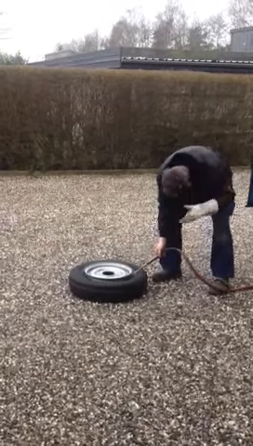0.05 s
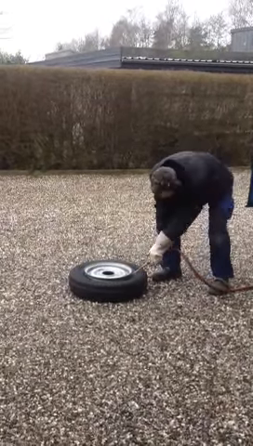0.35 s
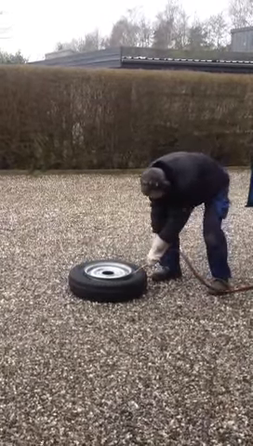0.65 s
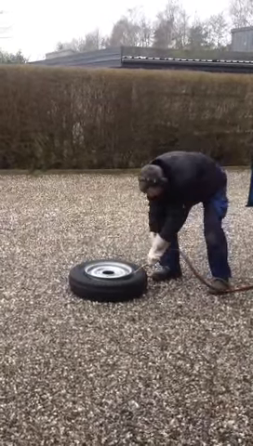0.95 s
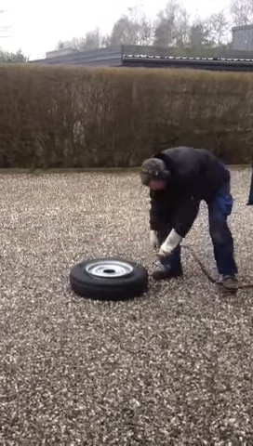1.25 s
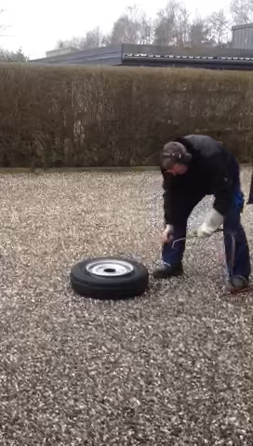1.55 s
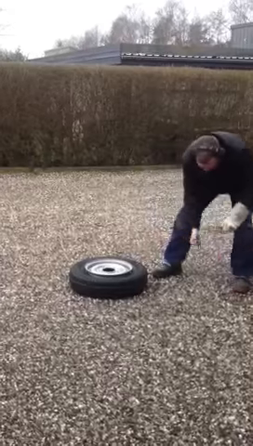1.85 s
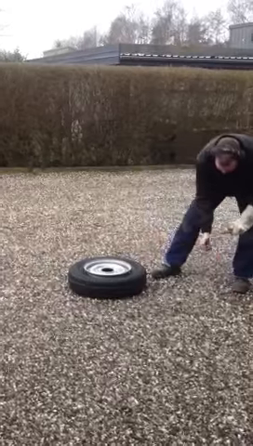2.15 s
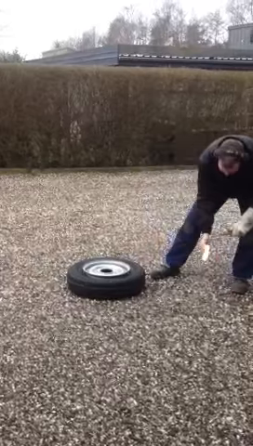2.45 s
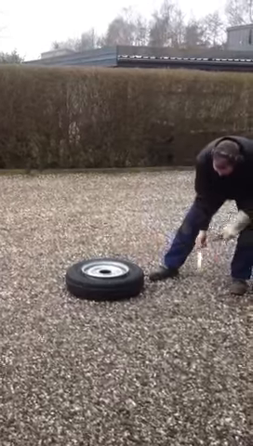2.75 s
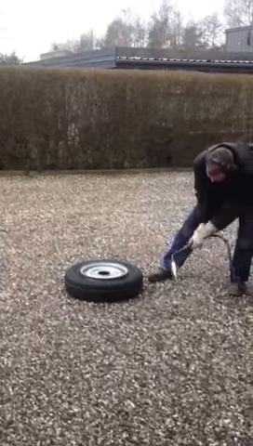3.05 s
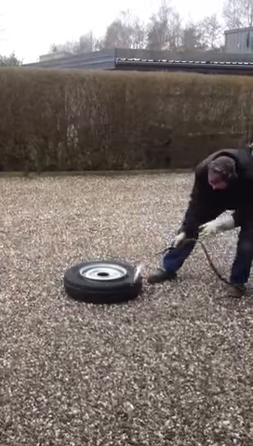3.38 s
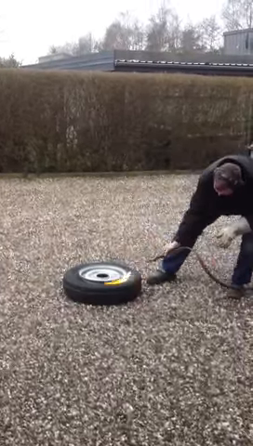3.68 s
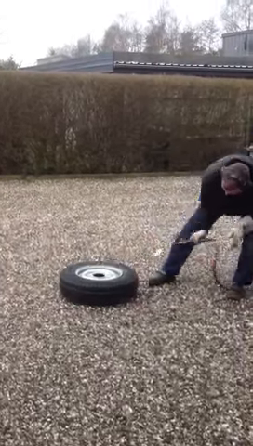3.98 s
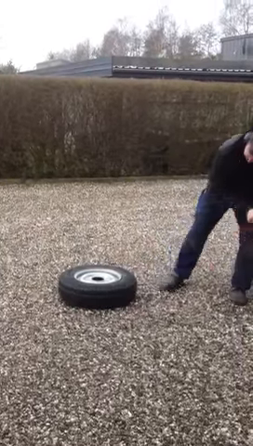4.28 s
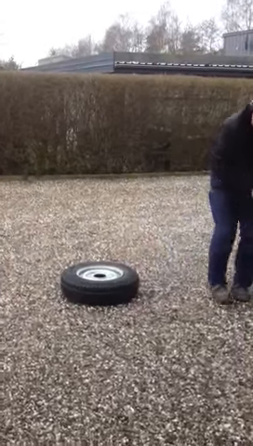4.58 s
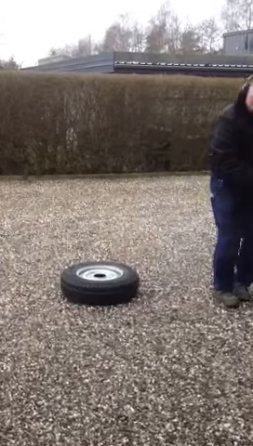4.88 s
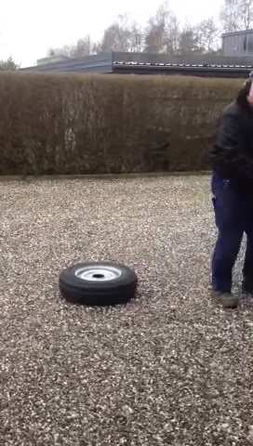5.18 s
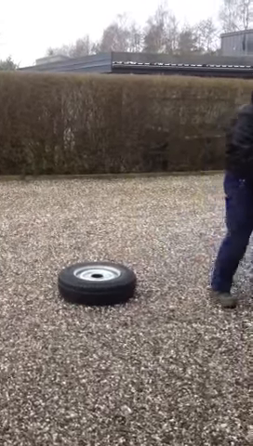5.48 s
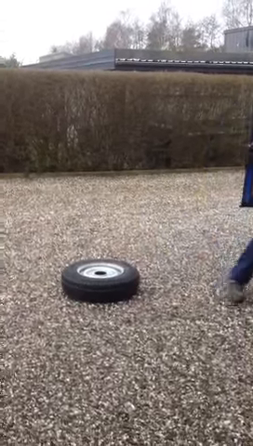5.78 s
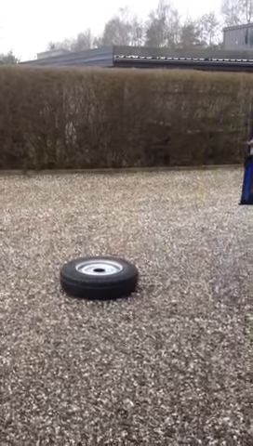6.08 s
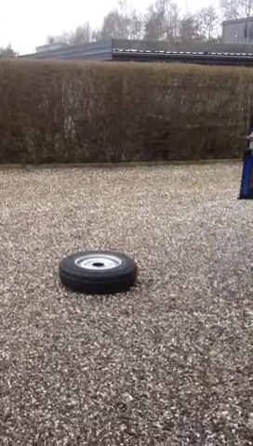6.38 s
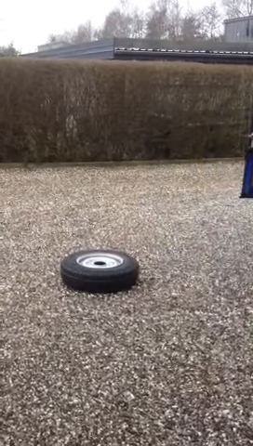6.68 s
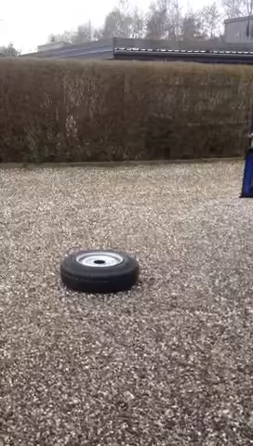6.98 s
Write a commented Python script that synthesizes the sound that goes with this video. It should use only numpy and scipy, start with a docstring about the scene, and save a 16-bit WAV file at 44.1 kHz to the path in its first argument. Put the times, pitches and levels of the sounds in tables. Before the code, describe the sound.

A quiet gravel yard is heard from one fixed microphone, with a faint distant rumble throughout. For the first two seconds feet shift and stones click, gas leaks very faintly, and a metal torch clinks lightly at about 1.2 seconds. At 2.5 seconds an igniter snaps sharply and the torch burns with a hiss over a soft roar. At 3.8 seconds vapour in a tyre explodes with a sharp bang, the loudest sound, slamming it onto its steel rim, which rings briefly. Air immediately hisses out, dulling and fading until about 6.3 seconds. Over this, the torch hiss turns loud and bright from 4.2 seconds and is shut off at 5. A few stones click around 6.3 seconds, then a compressed-air hose starts a softer, hollow hiss with a hoarse whistle, lasting to the end at 7 seconds. A slight gust brushes the microphone just before the end.

```python
"""A gravel yard, one fixed microphone: a tyre is blown onto its steel rim with fire, then filled with air.
Feet shift on the stones, gas leaks and the torch clinks; it snaps alight and roars. The vapour in the
tyre goes off with a bang that slams the beads home. Air hisses out and dies away, and meanwhile the
torch swings round and is shut off. Last, a compressed-air hose starts to blow and a gust brushes the
microphone. A distant rumble lies under it all."""
import sys
import numpy as np
from scipy import signal
from scipy.fft import rfft, irfft, next_fast_len
from scipy.io import wavfile
from scipy.ndimage import uniform_filter1d, map_coordinates

SR = 44100
rng = np.random.default_rng(int(sys.argv[2]) if len(sys.argv) > 2 else 0)


def generate_wav(sig):
    """Save sig (samples, or channels by samples) to the path in sys.argv[1] as 16-bit PCM at SR."""
    pcm = np.round(np.clip(np.atleast_2d(sig).T, -1, 1) * 32767).astype(np.int16)
    wavfile.write(sys.argv[1], SR, pcm)


N = 310464
TIME = np.arange(N) / SR


def bang():
    """The vapour flashes and the beads slam on the rim; the steel wheel rings on into the yard."""
    # blows from the flash to the beads seating: t/s, level/dB, f/Hz, t60/s, share of rattle
    blows = [(3.8056, -6, 750, 0.016, 0.53), (3.8079, -5, 513, .02, 0.41), (3.812, -3, 203, 0.06, 0.13),
             (3.8174, 3, 5700, 0.0027, 0.26), (3.8275, 1, 595, 0.014, 0.59), (3.828, -8.5, 1990, .007, .85),
             (3.8285, -16.5, 239, 0.045, 0.19), (3.834, -2, 740, 0.024, 0.39),
             (3.838, -11.5, 554, 0.088, 0.59)]
    # modes of the wheel: f/Hz, level/dB, t60/s
    wheel_modes = [(233.6, 5.5, 0.24), (407, -2.5, 0.4), (546, -2, 0.55), (678, -20, 0.33),
                   (857, 15, 0.082), (980, -13, 0.63), (1047, -19, 0.73), (1098, -25, 0.3), (1224, 6, 0.1),
                   (1562, 0.5, 0.073)]
    t, out = np.arange(SR // 2) / SR, np.zeros(N)
    for s, db, hz, t60, share in blows:
        # the rattle spreads around each blow's pitch
        band = signal.butter(2, [hz / 4, min(2 * hz, SR / 5)], "band", fs=SR, output="sos")
        rattle = unit(signal.sosfilt(band, rng.standard_normal(len(t))))
        thud = np.sin(2 * np.pi * hz * t)
        add(out, s, amp(db - 60 * t / t60) * ((1 - share) * thud + share * rattle))
    ring = sum(amp(db - 60 * t / t60) * np.sin(2 * np.pi * hz * t) for hz, db, t60 in wheel_modes)
    add(out, blows[-1][0], amp(-29.5) * ring)
    return yard_echo(out, first_db=-15, late_db=-18, first_t60=0.09)


def tyre_cavity():
    """The air in the tyre rings after the bang and sags in pitch as it cools."""
    # the sagging note: t/s, f/Hz, level/dB
    note = [(3.845, 562, -30.5), (3.89, 547, -32), (3.95, 507.7, -35), (4.0, 494, -35), (4.015, 488, -53),
            (4.09, 458, -47.5), (4.18, 441, -65)]
    return wavering_tone(note, rough=0.15, width_hz=25)


def bead_spurt():
    """Gas squeezes past the closing beads."""
    # spectrum of the spurt: f/Hz, level/dB
    colour = [(60, -21), (400, 5.5), (1200, 4.5), (3000, -2.5), (6000, 1), (9000, -24.5), (15000, -23.5)]
    squeeze = amp(-26) * attack(3.778, rise=0.039) * release(3.83, t60=0.052)
    return squeeze * tint(rng.standard_normal(N), colour)


def torch():
    """Gas leaks, then burns: a nozzle hiss over a roar, brighter once it faces the microphone."""
    # spectrum of the unlit gas: f/Hz, level/dB
    gas_colour = [(120, -13), (200, -3), (500, 0), (1200, -6.5), (2100, -7.5), (3000, -7.5), (4400, -5.5),
                  (5100, -15), (6500, -9), (7300, -21), (8300, -15), (9800, -27), (12000, -21),
                  (15500, -31)]
    # spectrum of the flame: f/Hz, level/dB
    flame_colour = [(80, -37.5), (140, -11.5), (300, 0), (420, 0.5), (650, -2), (1200, 1), (2100, -1),
                    (3000, -3), (6000, -26)]
    # hiss of the nozzle aimed at the tyre: t/s, level/dB
    aimed_level = [(2.56, -41.5), (2.65, -39.5), (3.018, -43), (3.116, -36.5), (3.238, -33), (3.32, -42),
                   (3.602, -41), (3.632, -36.5), (3.698, -42), (3.762, -33.5), (3.78, -37)]
    # its spectrum: f/Hz, level/dB
    aimed_colour = [(1200, -33), (2000, -11), (2900, -9.5), (3600, -1.5), (4050, 0), (4450, 4.5),
                    (4950, -6.5), (5700, 0.5), (6500, -0.5), (7600, -7), (9700, -15.5), (12300, -16.5),
                    (13500, -21.5), (15500, -28)]
    # hiss of the nozzle swung round to the microphone: t/s, level/dB
    facing_level = [(4.29, -26.5), (4.448, -23), (4.484, -17), (4.586, -28), (4.646, -23), (4.73, -23.5),
                    (4.95, -20.5)]
    # its spectrum from the front: f/Hz, level/dB
    facing_colour = [(1290, -32.5), (2200, -18.5), (2610, -14.5), (3420, -10), (4330, 1.5), (5060, -5),
                     (5720, 0.5), (6160, -3.5), (7190, 3.5), (8060, 0), (9340, -12.5), (12500, -10),
                     (13800, -33), (14800, -12), (15500, -22)]
    lit_s, near_s, shut_s, valve_s = 2.505, 3.5, 4.958, 0.034

    leaking = amp(-65.5) * attack(0.21, rise=0.27) * release(lit_s, t60=valve_s)
    gas = leaking * turbulence(gas_colour, patchy_db=0.5, flutter_db=0.9, echo=0.15)
    # once shut off, the flame lives on briefly on the gas left in the pipe
    supply = amp(-4.5 * attack(shut_s, rise=valve_s)) * release(5.09, t60=0.28)
    alight = attack(lit_s, rise=0.01) * supply
    aimed = amp(-0.07) * held(aimed_level) * alight * release(3.8, t60=1)
    nozzle = aimed * turbulence(aimed_colour, patchy_db=3, flutter_db=0.25, echo=0.23)
    away = 1 - attack(lit_s, rise=near_s - lit_s)  # the flame gains body as the torch comes nearer the tyre
    burning = alight * attack(lit_s, rise=0.17) * amp(-42.5 - 4 * away)
    flame = burning * turbulence(flame_colour, patchy_db=2.8, flutter_db=0.2, echo=0.22)
    facing = amp(-1.3) * held(facing_level) * attack(4.21, rise=0.11) * release(shut_s, t60=valve_s)
    rush = facing * turbulence(facing_colour, patchy_db=2.5, flutter_db=0.73, echo=0.15)
    on_tyre = amp(-53 - 8 * abs(TIME - 3.33))  # the low flutter peaks as the flame plays on the tyre
    flutter = on_tyre * alight * band_noise(180.4, width_hz=85)
    return gas + nozzle + flame + rush + flutter


def escaping_air():
    """A jet at the tyre fades and dulls as the pressure behind it falls; a narrow band in its treble sinks too."""
    # spectrum of the jet: f/Hz, level/dB
    colour = [(300, -44.5), (1400, -22.5), (2050, -12), (2600, -13.5), (3400, -6.5), (4300, -2.5),
              (5000, -6.5), (6000, 0), (6800, 0.5), (8000, -6.5), (9200, -10.5), (11000, -14),
              (12200, -12.5), (15300, -21)]
    spent_s, run_down_s = 6.367, 1.674
    flow = np.clip((spent_s - TIME) / run_down_s, 0, 1)
    jet = turbulence(colour, patchy_db=2.5, flutter_db=0.5, echo=0.069)
    treble = signal.sosfiltfilt(signal.butter(2, 9500, "high", fs=SR, output="sos"), jet)
    spit_db = 6.5 * swell(4.07, length=0.04)  # the jet spits once, brightly
    treble_gain = amp(6.5 + spit_db) * flow ** 0.51
    sinking_band = amp(-18.5) * hoarse_tone(8300 + 5200 * flow, width_hz=250)
    loudness = amp(-29) * attack(3.84, rise=0.12) * flow ** 1.247
    return loudness * (jet + (treble_gain - 1) * treble + sinking_band)


def hose():
    """Compressed air sounds hollow in its tube, and whistles hoarsely at the coupling."""
    # spectrum of the air in the tube: f/Hz, level/dB
    colour = [(150, -45), (250, -15), (411, -14), (609, -34), (699, -17), (904, -13.5), (1860, -10),
              (2020, -7.5), (2950, -11), (4220, -1.5), (5190, -9.5), (8100, 2), (9280, -13.5),
              (10600, -11.5), (15000, -27)]
    # the coupling chirps up as the air starts, then holds its note: t/s, f/Hz, level/dB
    note = [(6.38, 4200, -63), (6.44, 4180, -58), (6.46, 4250, -48), (6.485, 4420, -51), (6.6, 4270, -49.5),
            (6.8, 4300, -60), (7.04, 4280, -57)]
    on_s, build_s = 6.44, 0.18  # the valve opens quickly, then the flow keeps building
    open_s = np.maximum(TIME - on_s, 0)
    flow = amp(-42.5 - 9 * np.exp(-open_s / build_s)) * attack(on_s, rise=0.088)
    air = turbulence(colour, patchy_db=3.5, flutter_db=0.7, echo=0.24, lag_ms=1.88)
    climbing_tone = amp(-24) * hoarse_tone(9700 + 2900 * open_s, width_hz=200)
    fuzz = amp(-4) * band_noise(4280, width_hz=350) + amp(-9) * band_noise(3760, width_hz=220)
    whistle = amp(-3) * wavering_tone(note, rough=3, width_hz=80)
    return flow * (air + climbing_tone) + whistle + note_gain(note) * fuzz


def igniter():
    """A spring hammer snaps and rebounds."""
    # trigger, snap and rebounds: t/s, level/dB, extra treble/dB
    strikes = [(2.487, -22.5, 34), (2.498, -1.5, -2), (2.4992, -9.5, 7), (2.5038, -20, -10),
               (2.5065, -23, -19)]
    # spectrum of one strike: f/Hz, level/dB
    colour = [(80, -51), (130, -11.5), (220, -6), (450, -9.5), (950, 1.5), (1800, 0.5), (2250, -2.5),
              (2650, 0), (3000, -7.5), (3400, -0.5), (4450, -4.5), (6200, -16.5), (7100, -24), (15000, -44)]
    out = np.zeros(N)
    for s, db, treble_db in strikes:
        add(out, s, amp(db) * click(colour, treble_db))
    return yard_echo(out, first_db=-5, late_db=-15.5, first_t60=0.076)


def gravel():
    """Single stones click and chatter; soles grind many small ones and raise grit; the hose drags."""
    # stones clicking underfoot: t/s, level/dB, extra treble/dB
    stones = [(0.177, -45.5, -11), (0.204, -44, -22), (0.474, -46, -5), (0.522, -46, -5),
              (0.5756, -35.5, -14), (1.102, -27, -8), (1.112, -32, -10), (1.568, -29.5, -22),
              (1.626, -31, -12), (1.769, -35.5, 10), (1.801, -31.5, -15), (1.883, -38, -6),
              (1.892, -34.5, 5), (1.935, -24.5, -19), (1.965, -26, -6), (1.976, -23.5, -21),
              (2.02, -32, -11), (2.113, -26.5, -7), (6.305, -36.5, 9), (6.351, -30, 7), (6.432, -31, 9)]
    # spectrum of one stone: f/Hz, level/dB
    stone_colour = [(100, -16), (300, -19), (800, 5), (1300, 7.5), (2200, -1.5), (3200, 4.5), (4400, -1.5),
                    (5200, -6.5), (6400, -1.5), (9500, -66), (15000, -30)]
    # soles grinding the gravel: t/s, level/dB, rise/s, length/s, crunch f/Hz
    steps = [(0.194, -57.5, .008, .03, 1090), (0.573, -45, 0.0012, 0.011, 660),
             (1.05, -43.5, 0.047, 0.06, 1480), (1.188, -42, 0.014, 0.059, 3300),
             (1.364, -52, .015, 0.051, 5500), (1.57, -45.5, .001, 0.016, 1320),
             (1.62, -46.5, .004, 0.055, 1870), (1.786, -51, .006, 0.044, 1210),
             (1.886, -46, 0.026, 0.063, 2000), (1.936, -42, .002, 0.061, 1230),
             (2.089, -47.5, .002, .011, 4620), (2.109, -47, 0.0023, 0.026, 1400),
             (6.504, -40.5, .001, .006, 6360), (6.533, -45.5, 0.0056, 0.046, 790),
             (6.63, -43.5, .003, 0.04, 756), (6.878, -45, 0.0032, 0.036, 474)]
    # spectrum of the hissing grit: f/Hz, level/dB
    grit_colour = [(60, -35), (120, -13.5), (200, -3), (500, 0), (1200, 0.5), (2100, -5.5), (3000, -8.5),
                   (4400, -6), (5100, -13), (6500, -10), (8300, -17.5), (9800, -24.5), (12000, -20),
                   (15500, -27)]
    chatter_t60_s, grains_per_s, grain_spread_db = 0.014, 2600, 3
    t = np.arange(SR // 4) / SR
    out, pressure = np.zeros((2, N))
    for s, db, treble_db in stones:
        chatter = rng.standard_normal(len(t)) * amp(-60 * t / chatter_t60_s)
        contacts = (t == 0) + amp(-2.5) * chatter / np.linalg.norm(chatter)
        add(out, s, amp(db) * signal.fftconvolve(contacts, click(stone_colour, treble_db)))
    for s, db, rise, length, hz in steps:
        grains = rng.standard_normal(len(t)) * (rng.random(len(t)) < grains_per_s / SR)
        grains *= amp(grain_spread_db * rng.standard_normal(len(t)))
        crunch = unit(resonate(resonate(grains, hz, 0.45 * hz), hz, 2.1 * hz))
        weight = amp(db) * (1 - np.exp(-t / rise)) * np.exp(-(t / length) ** 2)
        add(out, s, weight * crunch)
        add(pressure, s, weight)
    drag = amp(-51) * attack(1.008, rise=0.17) * release(1.69, t60=0.82)
    grit = (drag + amp(-6) * pressure) * turbulence(grit_colour, patchy_db=1, flutter_db=1.5, echo=0.15)
    return yard_echo(out, first_db=-8, late_db=-15, first_t60=0.07) + grit


def clink():
    """One knock sets the metal of the torch ringing."""
    # modes of the metal: f/Hz, level/dB, t60/s
    modes = [(1320, -0.5, 0.11), (1390, 3, 0.1), (2367, -3, 0.17), (2490, 4, 0.1), (2980, -8.5, 0.39),
             (3383, -0.5, 0.37), (3425, 2, 0.22), (3920, -8.5, 0.46), (3970, -11, 0.23), (4280, -3, 0.48),
             (4624, -15, .35), (5518, -11, 0.35), (6492, -9, 0.18)]
    t, out = np.arange(SR // 2) / SR, np.zeros(N)
    ring = sum(amp(db - 60 * t / t60) * np.sin(2 * np.pi * (hz * t + rng.random()))
               for hz, db, t60 in modes)
    onset = 1 - np.exp(-t / 0.00067)
    add(out, 1.214, amp(-37) * ring * onset)
    return yard_echo(out, first_db=-10, late_db=-13.5, first_t60=0.089)


def thin_whistle():
    """A faint whistle slips down in pitch before the torch is lit."""
    # its glide: t/s, f/Hz, level/dB
    note = [(0.64, 2580, -78), (0.76, 2480, -76), (0.79, 2200, -101), (0.83, 2070, -72), (0.93, 2080, -69),
            (1.02, 2080, -69), (1.06, 2010, -76)]
    return wavering_tone(note, rough=0.6, width_hz=70)


def outdoors():
    """The steady air of the yard, a distant rumble, and one gust on the microphone."""
    # spectrum of the quiet yard: f/Hz, level/dB
    air_colour = [(40, -35), (90, -7), (170, 9.5), (450, 2), (800, -4), (1500, -20.5), (3000, -16.5),
                  (6500, -18), (10000, -34.5), (13500, -22), (15500, -20)]
    # spectrum of the far-off rumble: f/Hz, level/dB
    rumble_colour = [(50, -35), (100, -7.5), (160, -6), (300, -9), (900, -3.5), (2000, -4), (4000, -22.5)]
    # its slow rise and fall: t/s, level/dB
    rumble_level = [(0, -72.5), (.5, -65), (2.4, -63), (5.2, -62), (5.7, -56.5), (7.04, -59.5)]
    air = amp(-66) * turbulence(air_colour, patchy_db=3.5, flutter_db=1)
    rumble = held(rumble_level) * turbulence(rumble_colour, patchy_db=1.5, flutter_db=2)
    gust = amp(-55.5) * swell(6.9, length=0.08) * band_noise(120.4, width_hz=116)
    return air + rumble + gust


def yard_echo(x, first_db, late_db, first_t60):
    """Adds quick scatter from the gravel and the wheel, then a faint tail from hedge and buildings."""
    # decay of the yard: f/Hz, t60/s
    decay = [(100, 0.12), (400, 0.62), (900, 0.63), (2000, 0.59), (6000, 0.22), (14000, 0.12)]
    t = np.arange(SR // 2) / SR
    taps = rng.choice([-1., 1.], len(t)) * (rng.random(len(t)) < 4000 / SR) * (t > 0.002)
    hz, frame_s, spectra = signal.stft(taps, SR, nperseg=256)
    fading = amp(-60 * frame_s / read(decay, hz)[:, None])
    tail = signal.istft(spectra * fading, SR, nperseg=256)[1][:len(t)]
    first = rng.standard_normal(len(t)) * amp(-60 * t / first_t60) * (t > 0.001)
    response = amp(first_db) * first / np.linalg.norm(first) + amp(late_db) * tail / np.linalg.norm(tail)
    return x + signal.fftconvolve(x, response)[:N]


def turbulence(colour, patchy_db, flutter_db, echo=0, lag_ms=None, size=512):
    """Noise of rms 1 with drifting patches, a shared flutter and the comb of a close reflection."""
    # lag of the ground echo as the torch moves, used unless lag_ms is given: t/s, lag/ms
    ground_lag = [(2.4, 0.96), (2.55, 3), (3.55, 1.47), (6.3, 2.6)]
    if lag_ms is None:
        lag_ms = np.interp(TIME, *np.transpose(ground_lag))
    frames, bins = N * 4 // size + 5, size // 2 + 1
    real, imag, patches = rng.standard_normal((3, frames, bins))
    patches = unit(uniform_filter1d(uniform_filter1d(patches, size=30, axis=0), size=2, axis=1))
    flutter = unit(uniform_filter1d(rng.standard_normal(frames), size=6))
    spectra = (real + 1j * imag) * amp(patchy_db * patches + flutter_db * flutter[:, None])
    noise = signal.istft(spectra.T, nperseg=size, noverlap=size - size // 4)[1][:N]
    reflection = map_coordinates(noise, [np.arange(N) - np.round(lag_ms * SR / 1000)], order=0)
    return tint(noise + echo * reflection, colour)


def click(colour, treble_db, size=2048):
    """The shortest causal pulse of a given colour, peak 1."""
    hz = np.fft.rfftfreq(size, 1 / SR)
    shelf_db = treble_db * read([(1200, 0), (6000, 1)], hz)
    log_gain = np.log(amp(read(colour, hz) + shelf_db))
    mirrored = np.r_[log_gain, log_gain[-2:0:-1]]
    pulse = np.fft.ifft(np.exp(np.conj(signal.hilbert(mirrored)))).real  # minimum phase
    return pulse / abs(pulse).max()


def wavering_tone(note, rough, width_hz):
    """A gliding tone (t/s, f/Hz, level/dB), partly smeared into a narrow band of noise."""
    s, hz, _ = np.transpose(note)
    smooth = signal.butter(2, width_hz, fs=SR, output="sos")
    a, b = unit(signal.sosfilt(smooth, rng.standard_normal((2, N))))
    angle = 2 * np.pi * np.cumsum(np.interp(TIME, s, hz)) / SR
    return note_gain(note) * unit((1 + rough * a) * np.sin(angle) + rough * b * np.cos(angle))


def hoarse_tone(hz, width_hz):
    """A narrow band of noise, rms 1, that follows a pitch."""
    a, b = signal.sosfilt(signal.butter(2, width_hz, fs=SR, output="sos"), rng.standard_normal((2, N)))
    angle = 2 * np.pi * np.cumsum(hz) / SR
    return unit(a * np.sin(angle) + b * np.cos(angle))


def band_noise(hz, width_hz):
    """Noise of rms 1 in one steep resonance."""
    return unit(resonate(resonate(rng.standard_normal(N), hz, width_hz), hz, width_hz))


def resonate(x, hz, width_hz):
    """A two-pole band-pass."""
    r = np.exp(-np.pi * width_hz / SR)
    return signal.lfilter([1 - r, 0, r - 1], [1, -2 * r * np.cos(2 * np.pi * hz / SR), r * r], x)


def tint(x, colour):
    """Gives a noise a spectrum, at rms 1."""
    size = next_fast_len(N, True)
    gain = amp(read(colour, np.fft.rfftfreq(size, 1 / SR)))
    return unit(irfft(rfft(x, size) * gain, size)[:N])


def read(points, hz):
    """Reads a curve (f/Hz, value) on a log-frequency axis."""
    f, value = np.transpose(points)
    return np.interp(np.log(hz + 1), np.log(f + 1), value)


def note_gain(note):
    """Gain of a note (t/s, f/Hz, level/dB), faded out beyond its ends."""
    s, _, db = np.transpose(note)
    gate = np.interp(TIME, [s[0] - 0.02, s[0], s[-1], s[-1] + 0.012], [0, 1, 1, 0])
    return amp(np.interp(TIME, s, db)) * gate


def held(rows):
    """Gain from a curve (t/s, level/dB) that keeps its end values."""
    return amp(np.interp(TIME, *np.transpose(rows)))


def attack(start, rise):
    """Opens evenly from silence to gain 1."""
    return np.clip((TIME - start) / rise, 0, 1)


def release(stop, t60):
    """Holds gain 1, then dies away."""
    return np.exp(-np.log(1000) * np.maximum(TIME - stop, 0) / t60)


def swell(centre, length):
    """A bell-shaped rise and fall."""
    return np.exp(-((TIME - centre) / length) ** 2)


def add(mix, s, sound):
    """Mixes a sound in at time s."""
    part = mix[round(s * SR):][:len(sound)]
    part += sound[:len(part)]


def amp(db):
    """Decibels to gain."""
    return 10 ** (np.asarray(db) / 20)


def unit(x):
    """Scales to rms 1."""
    return x / np.sqrt(np.mean(x ** 2) + 1e-20)


def scene():
    """All sources from one spot in the yard, the same on both channels."""
    mix = outdoors() + gravel() + clink() + torch() + igniter()
    mix += bang() + tyre_cavity() + bead_spurt()
    mix += escaping_air() + hose() + thin_whistle()
    return np.array([mix, mix])


def record(dry):
    """The microphone thins the lowest bass and flattens the highest peaks; the top treble is cut."""
    low_cut_hz, ceiling, high_cut_hz = 70, 0.74, 15450
    thin = signal.sosfilt(signal.butter(3, low_cut_hz, "high", fs=SR, output="sos"), dry)
    limited = thin / (1 + (thin / ceiling) ** 8) ** (1 / 8)
    low_pass = signal.firwin(511, high_cut_hz, window=("kaiser", 9), fs=SR)
    return signal.oaconvolve(limited, low_pass[None], "same")


dry = scene()
out = record(dry)
generate_wav(out)
```